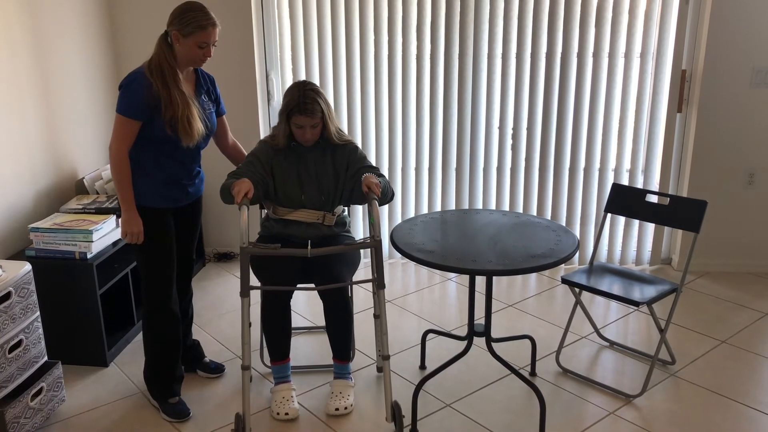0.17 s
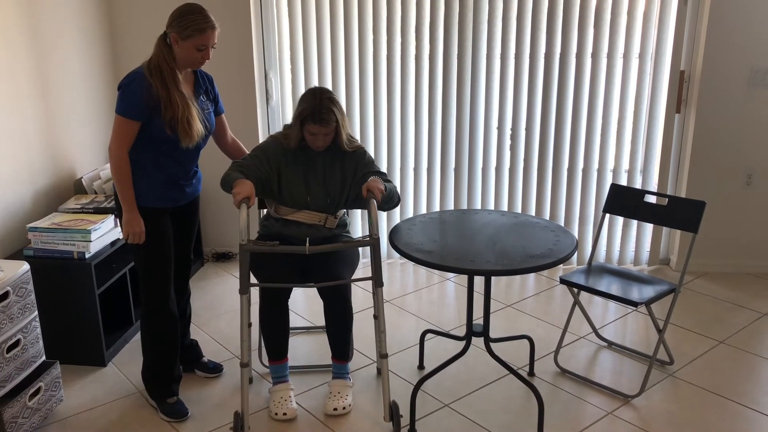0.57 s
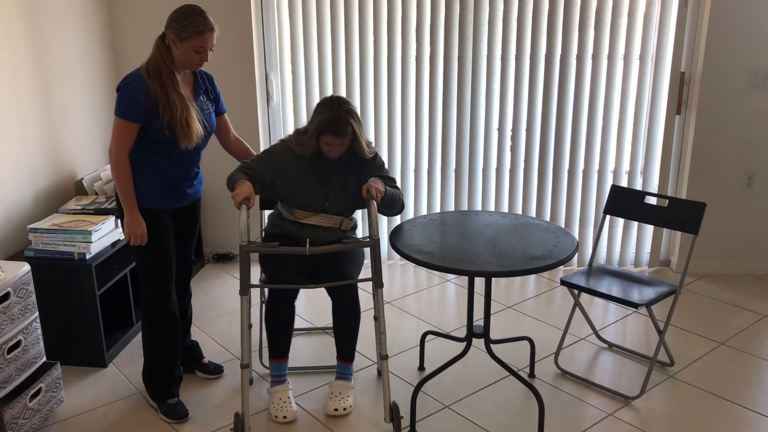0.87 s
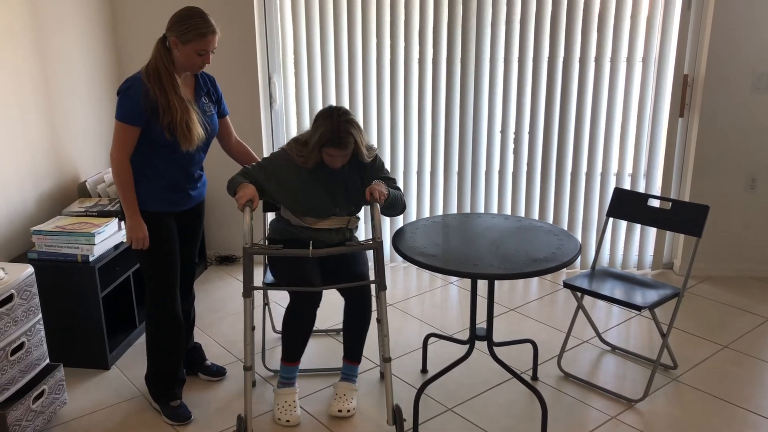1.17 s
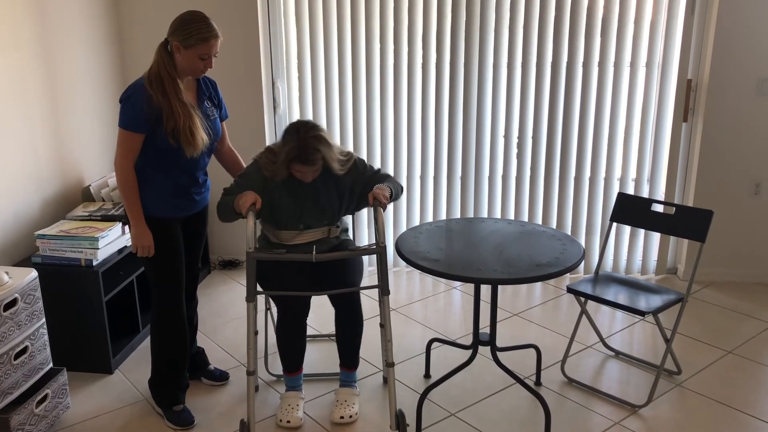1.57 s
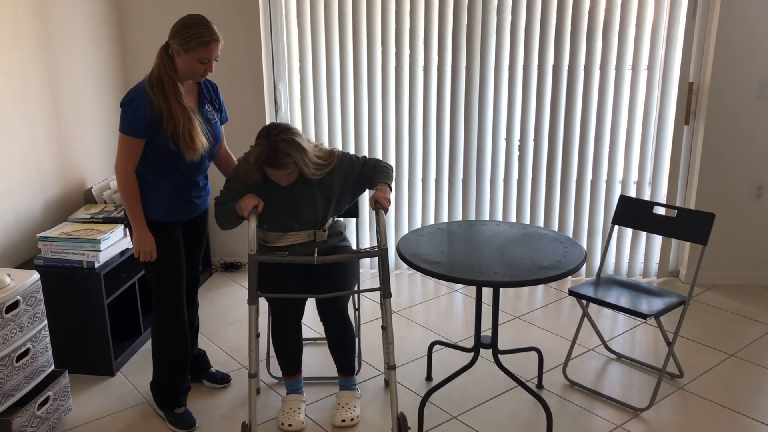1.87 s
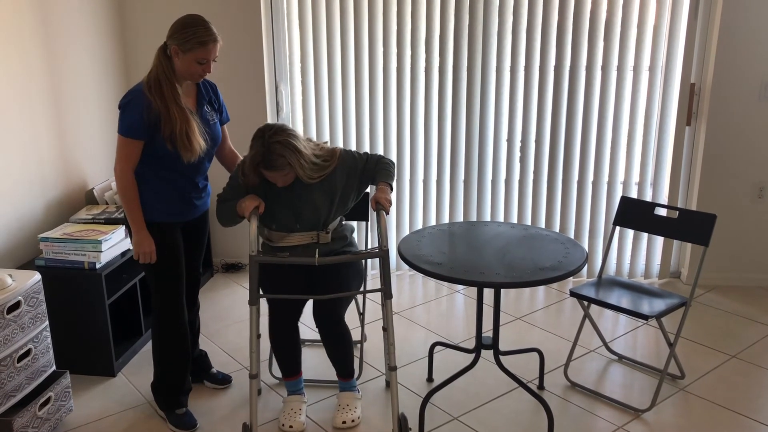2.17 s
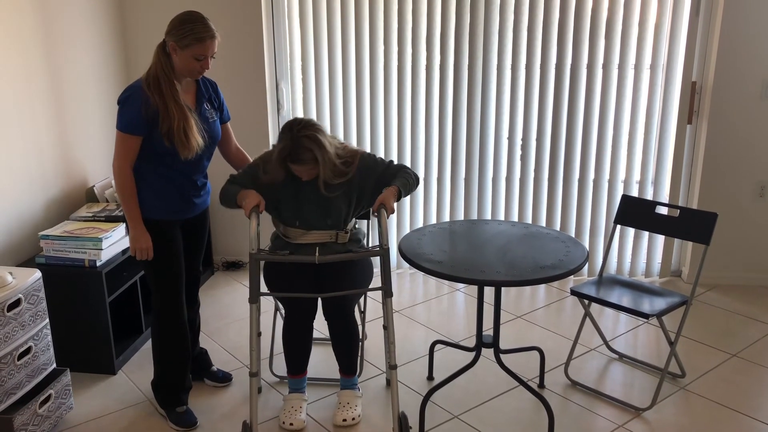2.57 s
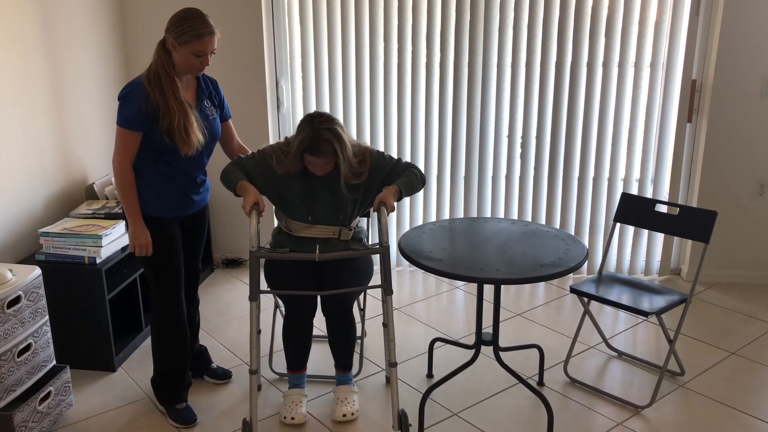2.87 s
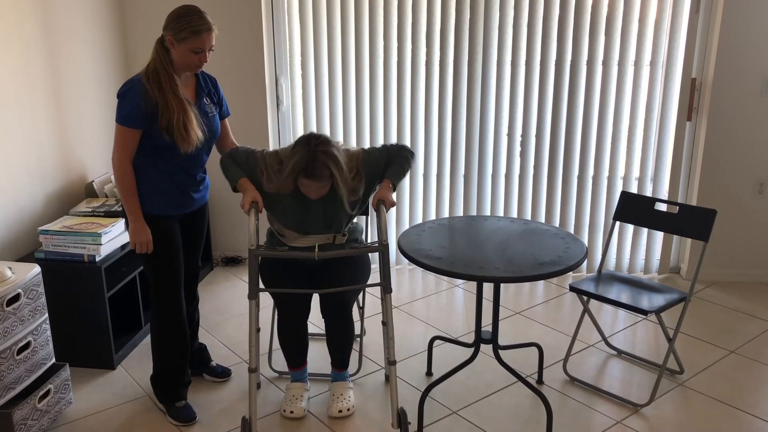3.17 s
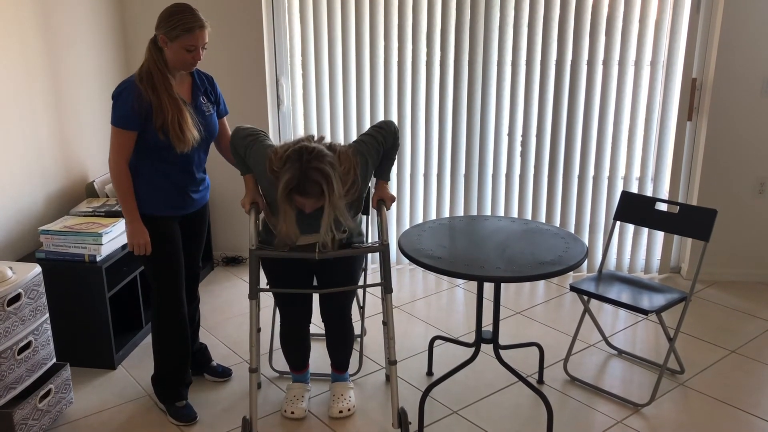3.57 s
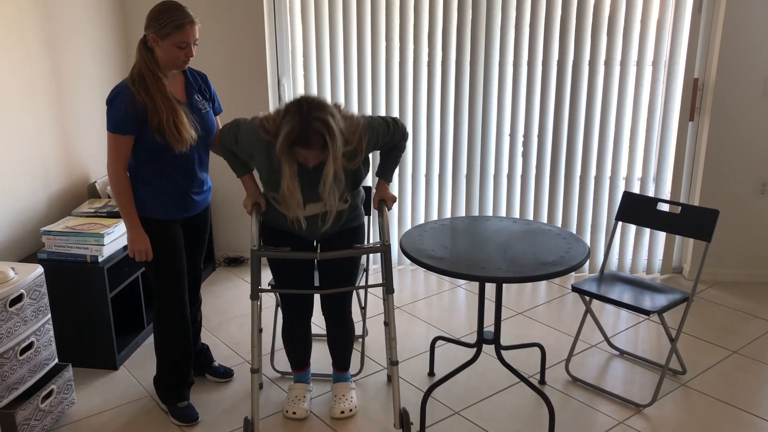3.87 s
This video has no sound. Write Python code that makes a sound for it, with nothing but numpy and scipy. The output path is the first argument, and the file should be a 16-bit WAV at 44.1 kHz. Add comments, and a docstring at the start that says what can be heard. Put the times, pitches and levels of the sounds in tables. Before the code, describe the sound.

An aluminium walking frame cracks sharply on a tile floor, then cloth rustles quietly and a loose metal part clicks near the end.

```python
"""An aluminium walking frame knocks hard on a tile floor in a bare, echoing room, then bumps more softly:
each contact is a crack with damped tube modes, filtered by its softness and smeared by chatter.
Clothes rustle as shaped noise and drag over a seat, noise through resonances, as someone shifts to stand.
Loose metal parts tick with small bright modes; a low hum of wavering sines and room noise lie behind."""
import sys
import numpy as np
from scipy import signal
from scipy.io import wavfile
from scipy.ndimage import uniform_filter1d

SR = 44100
rng = np.random.default_rng(int(sys.argv[2]) if len(sys.argv) > 2 else 0)


def master(y):
    """Save y as 16-bit WAV."""
    cut = np.clip(np.atleast_2d(y).T, -1, 1)
    pcm = np.round(cut * 32767)  # scale
    wavfile.write(sys.argv[1], SR, pcm.astype(np.int16))


def decibels_to_gain(level_db):
    """Convert a level in decibels to a linear amplitude gain (20 dB per decade)."""
    exponent = np.asarray(level_db, float) / 20
    return 10 ** exponent


N = 176841

# Low hum. Each row: time in seconds, pitch in Hz, level in dB.
HUM_CURVE = [(0, 88, -66.5), (.1, 89.9, -57.5), (.19, 90.5, -53), (.33, 92.8, -64), (.83, 94, -59.5),
             (.92, 89.5, -67.5), (1.25, 83.17, -66.5), (1.42, 90.5, -66.5), (1.75, 89.5, -67),
             (2.0, 88.1, -59), (2.33, 89.1, -55), (2.5, 88.5, -57.5), (2.85, 85, -77), (3.25, 90.5, -72.5),
             (3.5, 87, -82), (4.01, 89.5, -72)]
HUM_WAVER_DB, HUM_WAVER_HZ, WAVER_RATE_HZ = 1.2, 0.45, 5.9
# Swells of half the hum's pitch. Each row: peak in seconds, level in dB, rise and fall over 20 dB in seconds.
HALF_PITCH_SWELLS = [(.27, -75, 0.27, 0.58), (1.3, -69, 0.68, 0.31), (1.7, -75, 0.18, 4.5),
                     (2.3, -65.5, 0.73, 0.64), (3.57, -72, 0.12, 0.21)]
# Brief higher hum that grows and stops. Each row: peak in seconds, level in dB,
# rise and fall over 20 dB in seconds.
DRONE_SWELLS = [(.78, -66.5, .5, 0.61), (0.934, -63, 0.92, 0.023)]
DRONE_HZ = 150

# Colour of the room tone. Each row: frequency in Hz, relative density in dB per Hz.
AIR_COLOUR = [(15, -47), (25, -27), (92, -4), (120, -10.5), (217, -5), (301, -8), (416, -8.5), (489, -9),
              (677, -12), (840, -17), (1790, -20.5), (2050, -28), (16000, -37.5)]
AIR_DB = -63.5
WHINE_HZ, WHINE_WIDTH_HZ, WHINE_DB = 418.3, 3.3, -71  # narrow band in the room tone

# Colour of cloth on cloth. Each row: frequency in Hz, relative density in dB per Hz.
CLOTH_COLOUR = [(500, -10.5), (800, 1.5), (1400, -4.5), (2000, -4), (3000, -8), (4500, -8.5), (6500, -11),
                (9000, -19.5), (12000, -22.5), (16000, -32.5)]
# Movements that rub the clothes. Each row: peak in seconds, level in dB, rise and fall over 20 dB in seconds,
# brightness in dB per octave.
CLOTH_MOVES = [(.17, -66.5, .1, 1.2, -1.5), (.86, -62, 0.33, 0.54, 0.5), (1.05, -65.5, .5, 0.31, 5),
               (1.23, -62.5, 0.45, 0.15, -3), (1.6, -80, 0.45, .4, -3.5), (1.9, -56.5, 0.38, .3, 1.3),
               (1.975, -55.5, 0.24, 0.27, -0.1), (2.601, -68.5, 0.6, 1.5, -2),
               (2.845, -61.5, 0.078, .09, 3.5), (2.915, -57, 0.026, 0.12, 5.5), (2.95, -56.5, 0.04, 0.1, 3),
               (3.05, -70, .3, 2.6, 2.5), (3.7, -67, 1.63, .9, -4.5)]

# Ticks of the loose metal part. Each row: start in seconds, level in dB before the low cut, chatter in seconds.
PART_TICKS = [(0.158, -70, 0.00093), (2.744, -67, 0.00091), (3.494, -34, 0.001), (3.5, -43.5, .002),
              (3.521, -42, 0.0015), (3.5593, -46, 0.0011)]
# Modes of the loose metal part. Each row: frequency in Hz, relative level in dB, 60 dB decay in seconds.
PART_MODES = [(1950, -14, .015), (3000, -12, .005), (4200, -9, .006), (5500, -3, .011), (6500, 0, .013),
              (8390, -18.5, .4), (8350, -3, .01), (10800, -10, .025), (12300, -8, .008), (14700, -17, .025),
              (15400, -13, .008)]
PART_ROOM_DB = -4.5  # the loose part is nearer, so its ticks sound drier than the blows on the floor

# Room decay. Each row: frequency in Hz, 60 dB decay in seconds, relative level in dB.
ROOM_DECAY = [(109.2, .4, 2), (280, 0.71, -5.5), (1146, 1.153, -10), (2920, 1.013, -14.5),
              (6360, 0.8, -7.5), (9000, 0.65, -11), (14360, 0.31, -5.5)]
ROOM_DB, FIRST_ECHO_S, BUILD_S = -24, 0.00098, 0.003308
EARLY_DB, EARLY_S = 2.5, 0.14  # near walls and floor make the first echoes stronger
BAND_EDGES_HZ = 32 * 2 ** np.arange(0, 9.6, 1 / 3)

# Frame contacts. Each row: start in seconds, level in dB over the chatter, contact high cut in Hz (soft is low),
# mass low cut in Hz (light touches carry no bass), chatter in seconds.
FRAME_CONTACTS = [(0.2517, -19.5, 15350, 413, 0.0017), (0.2578, -15, 15100, 1520, .0015),
                  (0.2607, -16.5, 2300, 290, 0.004), (.267, -21.5, 2650, 232.2, .005),
                  (.274, -28, 2600, 500, .004), (1.1595, -45.5, 1940, 325, 0.0023),
                  (1.171, -47, 528, 227, 0.0038), (2.436, -50.5, 800, 250, .002),
                  (2.533, -56.5, 11900, 3014, .003), (2.565, -58, 3480, 600, 0.0032),
                  (2.578, -52, 7740, 3760, .003), (2.582, -54.5, 1430, 700, 0.006),
                  (3.5584, -39.5, 9000, 4115, 0.003), (3.56, -45.5, 2500, 2400, 0.004)]
# Frame tubing, heavily damped by hands and rubber feet. Each row: frequency in Hz, relative level in dB,
# 60 dB decay in seconds.
FRAME_MODES = [(250, -17.5, 0.045), (356, -17.5, 0.11), (550, -9.5, 0.019), (650, 6, 0.01),
               (847, -14, 0.011), (1204, -1.5, 0.01), (1508, 1.5, 0.0075), (1915, 5.5, 0.012),
               (2200, -9, 0.017), (2734, -2.5, 0.015), (3250, -27, 0.012), (5560, -25, 0.0053),
               (6690, -14, 0.0053), (8720, -9, 0.0033), (11300, -26, 0.0022), (14500, 1, .002)]
FEET = 4  # the contacts pass from foot to foot, each heard through echoes of its own

# Seat resonances. Each row: frequency in Hz, width in Hz, relative level in dB.
SEAT_RESONANCES = [(312, 110, 7), (600, 23.4, -3), (800, 150, -6)]
# Weight drags over the seat. Each row: peak in seconds, level in dB, rise and fall over 20 dB in seconds.
SEAT_DRAGS = [(1.831, -60.5, 0.052, 0.21), (1.916, -49.5, 0.12, 0.27)]

TOP_CUT_HZ = 16600


def rms_one(x):
    """Scale to an RMS level of 1."""
    return x / np.sqrt(np.mean(x ** 2) + 1e-20)


def in_time(rows):
    """Columns of a curve at every sample."""
    s, *columns = np.transpose(rows)
    return [np.interp(np.arange(N) / SR, s, c) for c in columns]


def at_hz(points, hz, axis=1):
    """A table column read on a log-frequency axis."""
    table = np.array(points)
    return np.interp(np.log(hz), np.log(table[:, 0]), table[:, axis])


def drift(rate_hz):
    """Slow chance of spread 1: noise through two equal low-pass poles, drawn every 40 samples."""
    r = np.exp(-80 * np.pi * rate_hz / SR)
    noise = rng.standard_normal(N // 40 + 2002)
    slow = signal.lfilter([1], [1, -2 * r, r * r], noise)[2000:]  # skip the filter's start
    return np.interp(np.arange(N) / 40, np.arange(len(slow)), rms_one(slow))


def swell(s, peak_db, rise_s, fall_s):
    """Gain that climbs 20 dB in the rise time to a peak and sinks 20 dB in the fall time."""
    t = np.arange(N) / SR - s
    return decibels_to_gain(peak_db - 20 * np.where(t < 0, -t / rise_s, t / fall_s))


def bands(size):
    """Third-octave bands of noise with their centres; neighbours come from separate noises."""
    white = rng.standard_normal((2, size + 8000))
    for k, (low, high) in enumerate(zip(BAND_EDGES_HZ, BAND_EDGES_HZ[1:])):
        sos = signal.butter(2, [low, high], "band", fs=SR, output="sos")
        yield np.sqrt(low * high), signal.sosfilt(sos, white[k % 2])[8000:]


def resonance(x, hz, width_hz):
    """Two-pole peak of gain 1."""
    r = np.exp(-np.pi * width_hz / SR)
    zeros = np.array([1, 0, -1]) * (1 - r * r) / 2
    poles = [1, -2 * r * np.cos(2 * np.pi * hz / SR), r * r]
    return signal.lfilter(zeros, poles, x)


def level_over_chatter(blow, chatter_s):
    """Scale a blow so that its energy spread over the chatter time has level 1."""
    return blow / np.sqrt(np.sum(blow ** 2) / (chatter_s * SR))


def strike(modes, crack_db, chatter_s, size=14000):
    """A crack and ringing modes, scattered in time as the shock rattles through the joints."""
    t = np.arange(size) / SR
    hz, level_db, t60 = np.transpose(modes)[:, :, None]
    luck_db = 1.5 * rng.standard_normal((len(modes), 1))
    ringing = decibels_to_gain(level_db + luck_db - 60 * t / t60) * np.cos(2 * np.pi * hz * t)
    blow = ringing.sum(0)
    blow[0] += decibels_to_gain(crack_db)
    lags = 2 + (rng.uniform(0.06, 0.6, size=5) * chatter_s * SR).astype(int)
    for lag in lags:
        taps = np.r_[1, np.zeros(lag - 1), -0.72]  # allpass: smears the blow, keeps its colour
        blow = signal.lfilter(taps[::-1], taps, blow + 1e-18)
    return level_over_chatter(blow, chatter_s)


def add(out, s, sound):
    """Mix a sound in at a time."""
    at = round(s * SR)
    out[at:at + len(sound)] += sound[:N - at]


def hum():
    """A low wavering sine, swells of its half pitch, and a steady-pitched higher sine that comes and goes."""
    hz, level_db = in_time(HUM_CURVE)
    wavering_hz = hz + HUM_WAVER_HZ * drift(WAVER_RATE_HZ)
    phase = 2 * np.pi * np.cumsum(wavering_hz) / SR
    tone = decibels_to_gain(level_db + HUM_WAVER_DB * drift(WAVER_RATE_HZ)) * np.sin(phase)
    half = sum(swell(*row) for row in HALF_PITCH_SWELLS) * np.sin(phase / 2)
    drone = sum(swell(*row) for row in DRONE_SWELLS) * np.sin(2 * np.pi * DRONE_HZ * np.arange(N) / SR)
    return np.sqrt(2) * (tone + half + drone)  # table levels are RMS


def room_tone():
    """Dull air noise, its bands drifting slowly by 1 dB, with one narrow band standing out."""
    air = sum(decibels_to_gain(at_hz(AIR_COLOUR, hz) + 1.0 * drift(1.1)) * band for hz, band in bands(N))
    whine = resonance(rng.standard_normal(N), WHINE_HZ, WHINE_WIDTH_HZ)
    return decibels_to_gain(AIR_DB) * rms_one(air) + decibels_to_gain(WHINE_DB) * rms_one(whine)


def clothes():
    """Fibres rub as fine noise, a little patchy from band to band; overlapping movements add in power."""
    powers = np.array([swell(*move[:4]) ** 2 for move in CLOTH_MOVES])
    power = powers.sum(0)
    bright_db = np.array(CLOTH_MOVES)[:, 4] @ powers / power  # the strongest movement sets the colour most
    together = drift(19)
    rub = np.zeros(N)
    for hz, band in bands(N):
        if hz > 500:
            tilt_db = bright_db * np.log2(hz / 5000)
            patchy_db = 0.75 * together + 0.5 * drift(15.8)
            rub += decibels_to_gain(at_hz(CLOTH_COLOUR, hz) + tilt_db + patchy_db) * band
    local_rms = np.sqrt(uniform_filter1d(rub ** 2, size=8000))
    return np.sqrt(power) * rub / local_rms


def loose_part():
    """Small bright metal ticks: struck modes with the lows cut."""
    out = np.zeros(N)
    low_cut = signal.butter(2, 2500, "high", fs=SR, output="sos")
    for s, level_db, chatter_s in PART_TICKS:
        blow = strike(PART_MODES, crack_db=-0.5, chatter_s=chatter_s)
        add(out, s, decibels_to_gain(level_db) * signal.sosfilt(low_cut, blow))
    return out


def room(x):
    """Dense echoes off tile and plaster: noise that builds quickly, each band dying at its own rate."""
    t = np.arange(int(1.3 * SR)) / SR
    tail = np.zeros(len(t))
    for hz, band in bands(len(t)):
        decay_db = at_hz(ROOM_DECAY, hz, axis=2) - 60 * t / at_hz(ROOM_DECAY, hz)
        tail += decibels_to_gain(decay_db) * band
    tail *= 1 - np.exp(-np.maximum(t - FIRST_ECHO_S, 0) / BUILD_S)
    tail *= decibels_to_gain(EARLY_DB * np.exp(-t / EARLY_S))
    return decibels_to_gain(ROOM_DB) * signal.fftconvolve(x, tail)[:N]


def frame():
    """Knocks, one track a foot: soft contacts excite only the low modes, light touches only the high."""
    out = np.zeros((FEET, N))
    for k, (s, level_db, contact_hz, mass_hz, chatter_s) in enumerate(FRAME_CONTACTS):
        blow = strike(FRAME_MODES, crack_db=1.5, chatter_s=chatter_s)
        softness = signal.butter(3, min(contact_hz, 0.45 * SR), fs=SR, output="sos")
        lightness = signal.butter(3, mass_hz, "high", fs=SR, output="sos")
        blow = signal.sosfilt(lightness, signal.sosfilt(softness, blow))
        add(out[k % FEET], s, decibels_to_gain(level_db) * level_over_chatter(blow, chatter_s))
    return out


def seat():
    """Stick-slip rubbing, as noise of slightly flickering level, shakes the seat's resonances."""
    slips = rng.standard_normal(N) * decibels_to_gain(0.69 * drift(38.3))
    body = sum(decibels_to_gain(db) * rms_one(resonance(slips, hz, width_hz)) for hz, width_hz, db in SEAT_RESONANCES)
    return sum(swell(*row) for row in SEAT_DRAGS) * rms_one(body)


def scene():
    """Knocks and ticks ring through the room over the soft layers, in mono."""
    knocks, ticks = frame(), loose_part()
    echoes = sum(room(foot) for foot in knocks) + room(decibels_to_gain(PART_ROOM_DB) * ticks)
    mix = knocks.sum(0) + ticks + echoes + clothes() + seat() + hum() + room_tone()
    return mix[None]


def low_pass(x):
    """Removes everything above the highest recorded frequency."""
    return signal.sosfilt(signal.butter(12, 16590, fs=SR, output="sos"), x)


def record(dry):
    """A steep low-pass takes off the top, 60 dB down from the cut upward."""
    top_cut = signal.cheby2(16, 60, TOP_CUT_HZ, fs=SR, output="sos")
    finished = signal.sosfilt(top_cut, dry)
    return low_pass(finished)


dry = scene()
out = record(dry)
master(out)
```